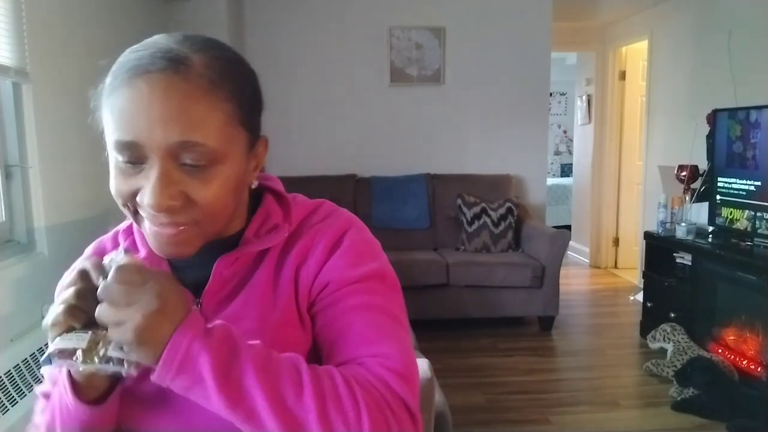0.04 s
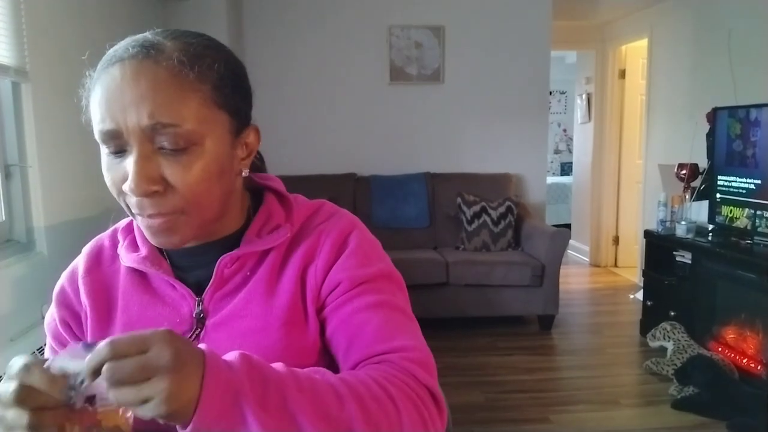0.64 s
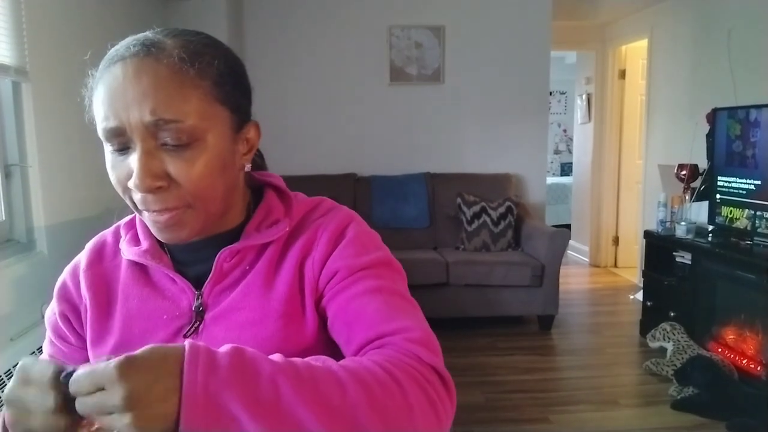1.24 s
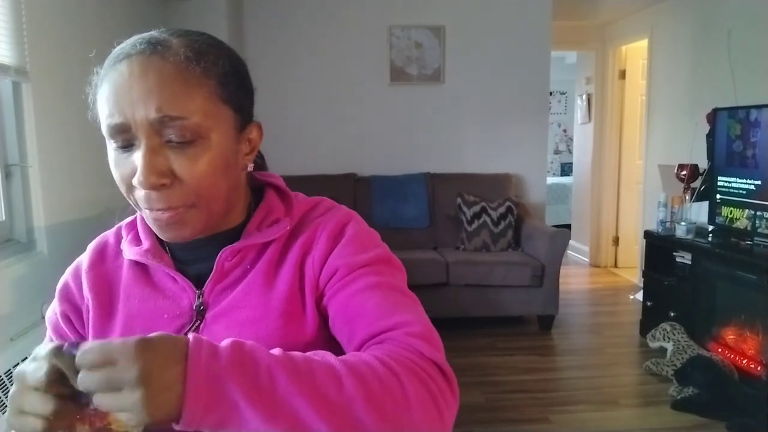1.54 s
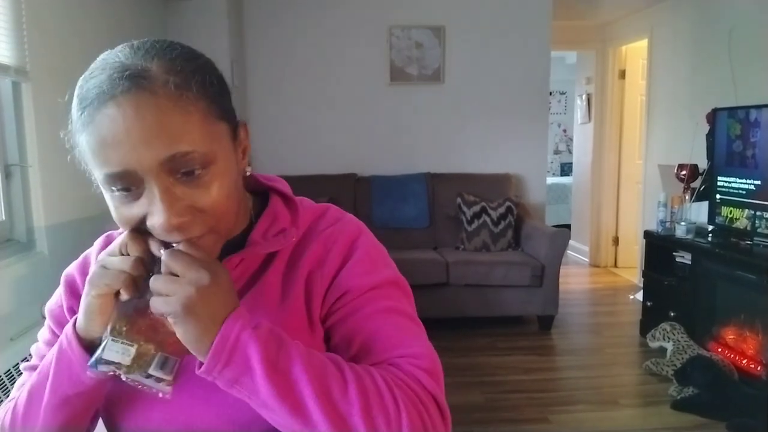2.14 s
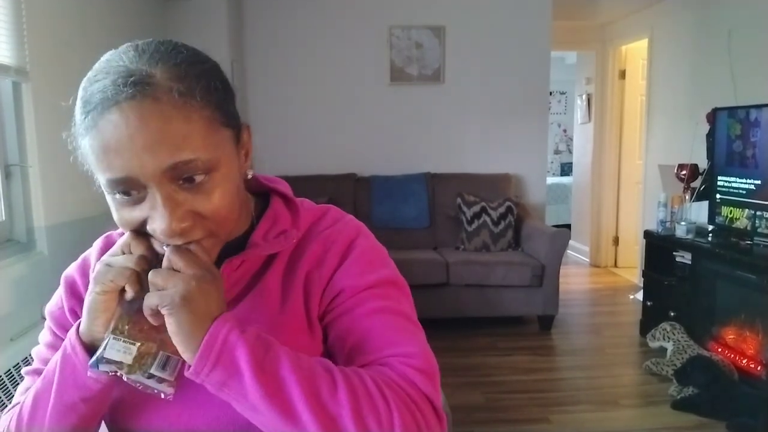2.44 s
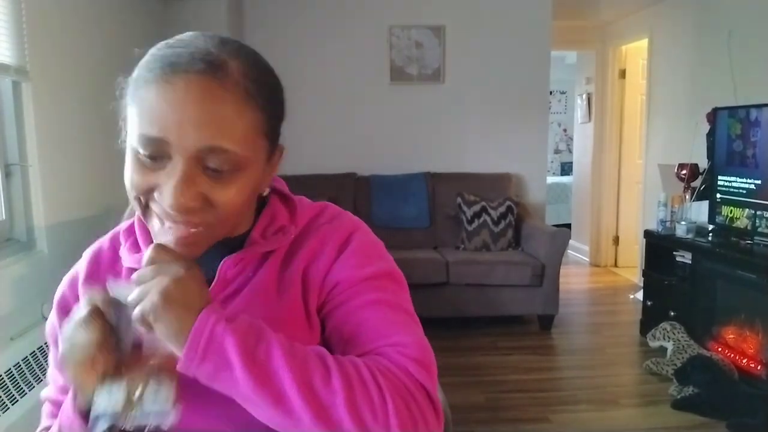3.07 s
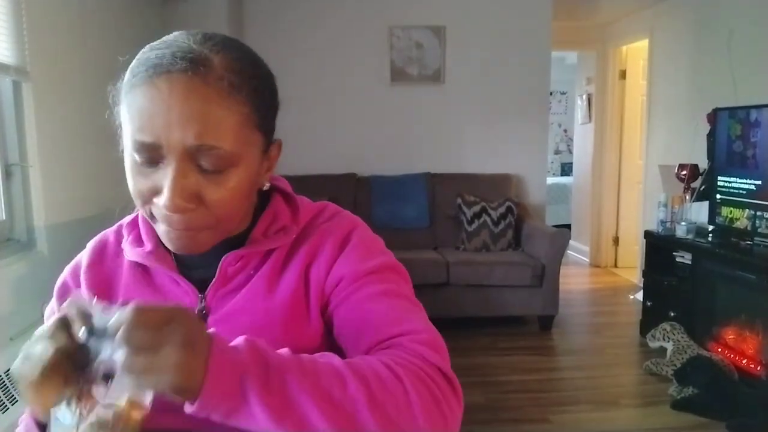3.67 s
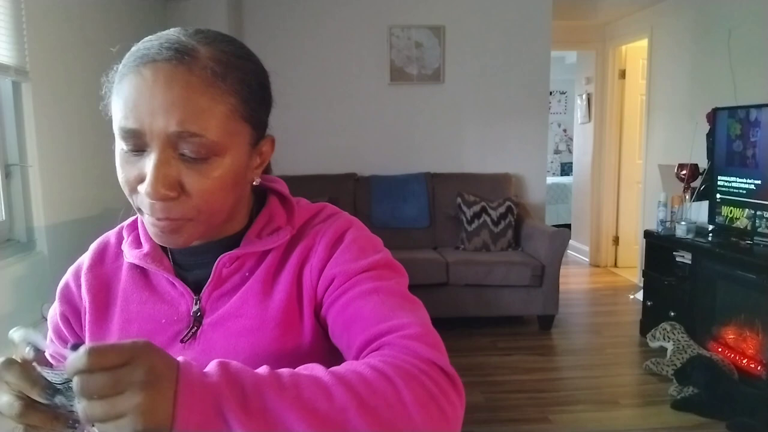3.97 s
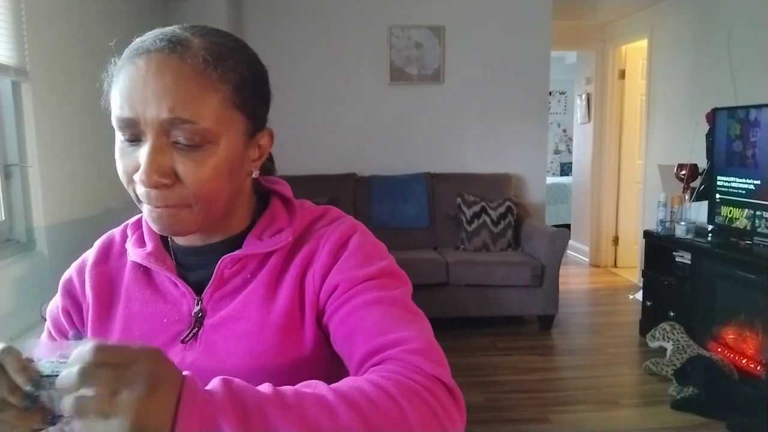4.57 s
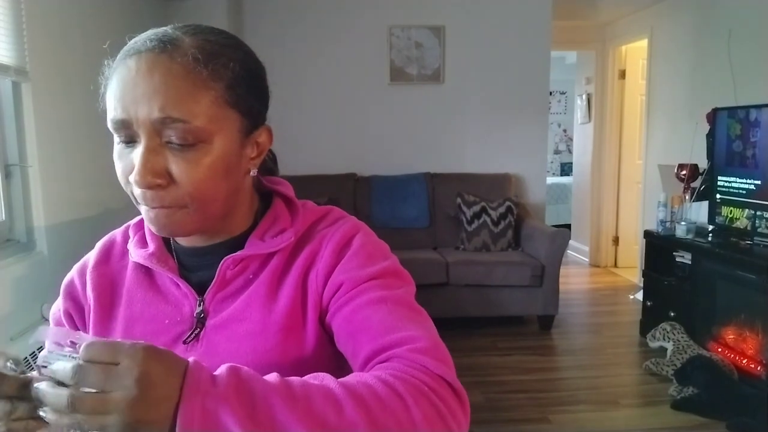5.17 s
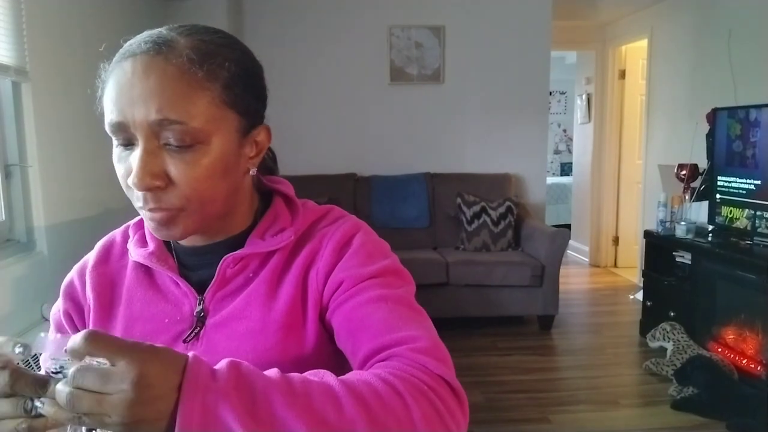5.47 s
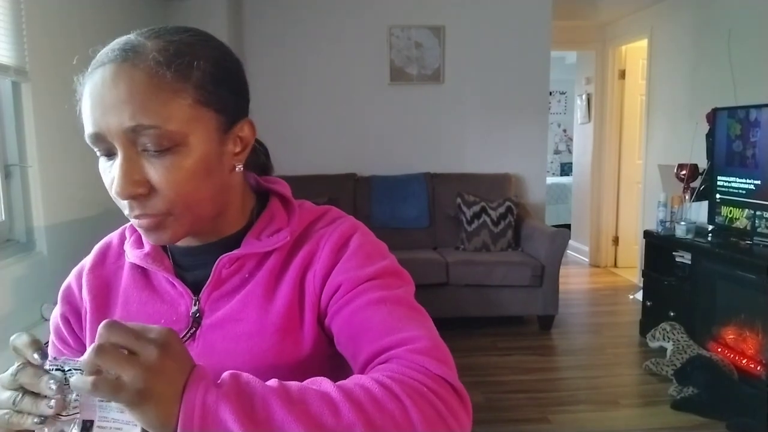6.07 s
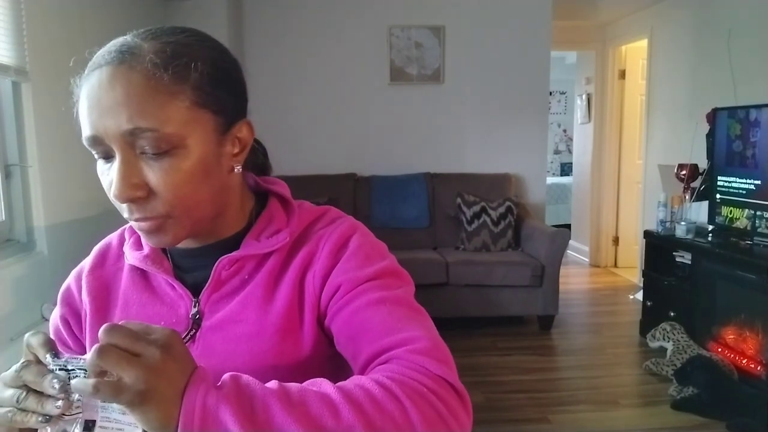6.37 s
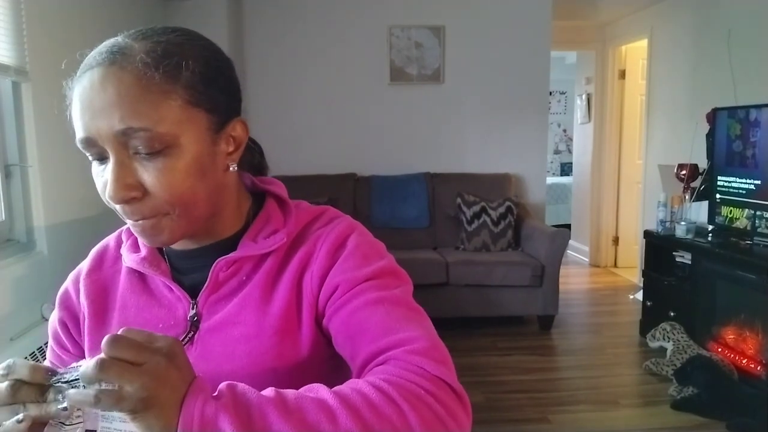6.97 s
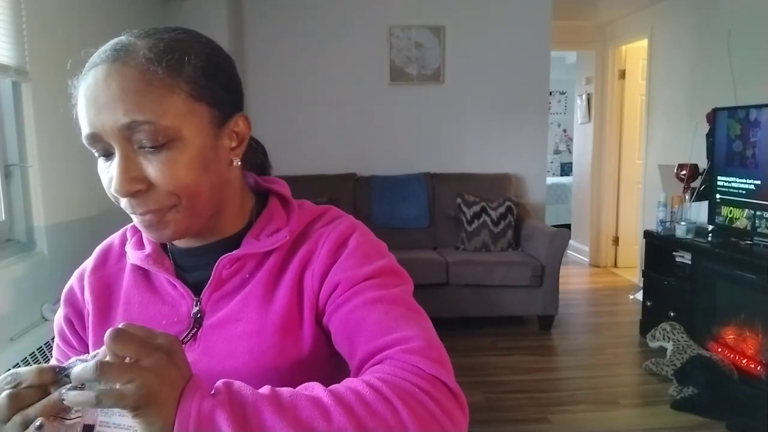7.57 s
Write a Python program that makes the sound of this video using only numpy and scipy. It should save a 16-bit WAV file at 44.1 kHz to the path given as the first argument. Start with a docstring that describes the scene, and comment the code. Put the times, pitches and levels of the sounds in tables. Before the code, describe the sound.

Close, bright crackling of a plastic packet being handled, bitten open with a pop and soft thuds, then handled gently in a quiet room.

```python
"""Living room, a plastic snack packet worked by hand close to a laptop's two microphone ports.
Over quiet room tone, tiny wrinkles crackle from the start, the film slips in short runs and creases
buckle with bright snaps that shake the sheet; desk and walls answer, with a few soft bumps beneath.
Bitten at the seam, the packet tears open at about 3 s: the loudest snaps, a hollow pop, then thuds
as the arms jerk apart. The handling goes on more lightly and thins out to a last small pop near 7.8 s."""
import sys
import numpy as np
from scipy import signal
from scipy.fft import rfft, irfft
from scipy.io import wavfile

SR = 44100
rng = np.random.default_rng(int(sys.argv[2]) if len(sys.argv) > 2 else 0)


def master_out(mix):
    """Clip the mix to full scale and print it as 16-bit PCM to the path in sys.argv[1]."""
    frames = np.transpose(np.atleast_2d(mix))
    ceiling = np.clip(frames, -1, 1)
    pcm = np.round(ceiling * 32767).astype(np.int16)
    wavfile.write(sys.argv[1], SR, pcm)


N = 344862


def undb(db):
    """Decibels to gain."""
    return 10 ** (np.asarray(db) / 20)


def colour(x, points, size=4096):
    """Causal filter through (Hz, dB) points, from the cepstrum of the log gain."""
    hz, db = np.transpose(points)
    grid = np.maximum(np.arange(size // 2 + 1) * SR / size, 1)
    gain = undb(np.interp(np.log(grid), np.log(hz), db))
    cepstrum = irfft(np.log(gain))
    cepstrum[1:size // 2] *= 2
    cepstrum[size // 2 + 1:] = 0
    response = irfft(np.exp(rfft(cepstrum)))[:size // 2]
    response = response.reshape((1,) * (x.ndim - 1) + (-1,))
    return signal.fftconvolve(x, response, axes=-1)[..., :x.shape[-1]]


def port_noise(shape, apart):
    """Noise at the two ports, shape (.., 2, samples); 'apart' is the share of power each has alone."""
    noise = rng.standard_normal((*shape[:-1], 3, shape[-1]))
    return np.sqrt(1 - apart) * noise[..., :1, :] + np.sqrt(apart) * noise[..., 1:, :]


def place(times, sounds):
    """Lays short sounds, shape (events, channels, samples), on the time line."""
    out = np.zeros((sounds.shape[1], N + sounds.shape[-1]))
    for start, sound in zip(np.clip(times * SR, 0, N).astype(int), sounds):
        out[:, start:start + len(sound[0])] += sound
    return out[:, :N]


# Spectrum of the quiet living room at the laptop: frequency_hz, gain_db
ROOM_TONE = [(24, -20), (38, 9), (55, -6.5), (90, -11), (160, -4.5), (350, -9), (700, -16), (1500, -25),
             (4000, -31), (7500, -32), (10300, -22), (13000, -49), (15000, -43)]

def room_tone(level_db=-66, split_hz=600):
    """Room rumble, shared by both ports, under a faint hiss that each port has on its own."""
    lowpass = signal.butter(1, split_hz, fs=SR)
    shared, own = port_noise((N,), apart=0.047), port_noise((N,), apart=1.0)
    rumble = signal.lfilter(*lowpass, shared)
    hiss = own - signal.lfilter(*lowpass, own)
    air = colour(rumble + hiss, ROOM_TONE, size=16384)
    return air / air.std() * undb(level_db)


# Spectra of a crease's crack, tick and flap as heard through the microphone ports,
# which ring near 10 kHz: frequency_hz, gain_db
CRACK = [(4000, -51.5), (7000, -21), (8900, -15.5), (10200, -3.5), (12200, -13.5), (15000, -27.5)]
TICK = [(2600, -22.5), (4300, -7), (7000, -3), (9500, -13)]
FLAP = [(100, -10.5), (300, -4.5), (700, 5.5), (930, -2.5), (1300, -2.5), (2700, 1.5), (6000, -3)]
# Crack, tick and flap of a flipping crease, at the ports: spectrum, low_pitch_hz, high_pitch_hz, decay_s
CREASE_FACETS = [(CRACK, 8500, 11500, .0008), (TICK, 3700, 7800, .0008), (FLAP, 1000, 3400, .0013)]

def shiver(times, db, facet, apart=0.54, ring_db=-7, beam_share=0.83, size=360):
    """A facet of film shivers, faintly pitched, beaming unevenly. Channels: left, right, into the room."""
    spectrum, low_hz, high_hz, decay_s = facet
    t = np.arange(size) / SR
    span = .0025 * SR  # levels are rms over 2.5 ms

    def unit_level(x):
        return x / np.sqrt(np.mean(x ** 2, axis=(1, 2), keepdims=True) * size / span)

    pitch, right_phase = rng.random((len(times), 2)).T[..., None, None]
    hz = low_hz * (high_hz / low_hz) ** pitch
    ring = undb(ring_db) * np.sqrt(2) * np.sin(2 * np.pi * hz * t + right_phase * np.array([[0], [1]]))
    envelope = t * np.exp(-2 * t / decay_s)
    burst = (port_noise((len(times), size), apart) + ring) * envelope
    beams = unit_level(colour(burst, spectrum, size=512))
    # the room gets all directions at once, so a smoother colour
    click = unit_level(colour(signal.unit_impulse((1, 1, size)), spectrum, size=512))
    all_round = unit_level(click + beam_share * beams[:, :1])
    return place(times, np.concatenate([beams, all_round], axis=1) * undb(db)[:, None, None])


def buckle(times, levels):
    """A crease flips: a bright crack, a tick of the fold and a slightly longer flap of the sheet."""
    return sum(shiver(times, db, facet) for db, facet in zip(levels, CREASE_FACETS))


# How hard the fingers work the film: time_s, level_db
FINGER_PRESSURE = [(0.0, -37.5), (0.41, -57), (0.6, -59), (1.09, -43.5), (1.5, -56), (1.85, -45.5),
                   (2.11, -44), (2.55, -57.5), (2.75, -44.5), (3.27, -43.5), (3.44, -54.5), (3.83, -43),
                   (4.09, -54), (5.2, -51.5), (5.9, -55), (6.45, -76), (6.99, -43.5), (7.23, -75.5),
                   (7.82, -58)]

def wrinkles(tick_db=-11, flap_db=-11, spread_db=4.5, count=520):
    """Tiny wrinkles give way at random, louder as the fingers press; most are faint, a few tick out."""
    jitter, strength = rng.random((count, 2)).T
    times = (np.arange(count) + 2 * jitter) / count * N / SR
    db = np.interp(times, *np.transpose(FINGER_PRESSURE)) + spread_db * (2 * strength ** 2 - 1)
    return buckle(times, (db, db + tick_db, db + flap_db))


# Runs of tearing or sliding film: start_s, length_s, crack_db, flap_db
RIP_RUNS = [(0.0, 0.086, -45.5, -56), (0.051, 0.026, -31.5, -46), (0.877, 0.07, -60, -78),
            (1.581, 0.23, -57, -70.5), (1.835, 0.047, -38.5, -56.5), (2.653, 0.23, -54, -63.5),
            (3.047, 0.02, -41, -45), (3.085, 0.019, -27.5, -36.5), (3.157, 0.055, -37.5, -51),
            (4.862, 0.033, -63, -75), (5.982, 0.041, -53.5, -62), (6.353, 0.018, -66.5, -71),
            (6.645, 0.019, -44.5, -67)]

def rips(slips_per_s=400, spread_db=5, fade_db=6, tick_db=-2.0):
    """The film gives in a fast uneven run of slips that weakens as the tension goes."""
    out = 0
    for start, length, crack_db, flap_db in RIP_RUNS:
        count = max(int(length * slips_per_s), 2)
        along = (np.arange(count) + rng.random(count)) / count
        scatter = spread_db * np.clip(rng.standard_normal(count), -2, 1)
        db = scatter - fade_db * (along ** 2 - .5)
        out = out + buckle(start + along * length, (crack_db + db, flap_db + tick_db + db, flap_db + db))
    return out


# Creases that snap out clearly, close to the microphone: start_s, crack_db, tick_db, flap_db
CREASE_SNAPS = [(0.0442, -27.5, -38, -48), (0.0604, -44, -30.5, -61), (0.172, -34.5, -43, -52),
                (0.2161, -29.5, -49, -46.5), (0.4966, -37.5, -54, -59), (0.5258, -27.5, -49, -40),
                (0.5473, -31.5, -44, -72), (0.5865, -29, -56, -42), (0.5917, -33.5, -40, -58),
                (0.638, -35, -43, -49), (0.6961, -43, -52, -49), (0.7612, -36.5, -53, -64),
                (0.806, -42, -45.5, -54.5), (0.9438, -30.5, -48, -53.5), (1.0355, -28, -61, -51),
                (1.0377, -23.5, -49, -56), (1.047, -42, -46, -50.5), (1.128, -36.5, -56, -55),
                (1.1471, -46, -60, -55), (1.2513, -40.5, -48.5, -56), (1.2768, -38, -59, -60),
                (1.3516, -35.5, -47.5, -52), (1.457, -29.5, -41.5, -73), (1.4654, -48, -49, -51.5),
                (1.62, -41.5, -46.5, -53), (1.6827, -45, -57, -49), (1.721, -40.5, -48.5, -59),
                (1.8006, -40, -45, -53), (1.8282, -29.5, -42.5, -59), (1.839, -28, -50, -71),
                (1.8533, -36, -46, -50), (1.9171, -31, -55, -65), (1.9583, -28.5, -42.5, -50.5),
                (2.061, -42, -72, -63), (2.155, -37.5, -53, -49), (2.2289, -29, -49, -45.5),
                (2.3225, -32, -44, -46.5), (2.451, -44, -50.5, -55.5), (2.5944, -43.5, -52, -58),
                (2.6725, -39, -70, -46.5), (2.7054, -31, -44.5, -55), (2.7235, -32, -49, -65),
                (2.7648, -23.5, -40, -40.5), (2.7902, -31.5, -42.5, -65), (2.8241, -34.5, -43.5, -47.5),
                (2.873, -34, -46, -46.5), (2.9359, -28.5, -50, -49), (2.9992, -41.5, -43.5, -50),
                (3.0264, -29, -58, -51), (3.0343, -28, -61, -42), (3.0529, -16.5, -51, -39),
                (3.0817, -15.5, -48, -34), (3.1547, -28.5, -47, -55), (3.1899, -19, -43, -41),
                (3.2705, -32, -66, -61), (3.295, -37, -51, -48.5), (3.3455, -33, -48, -58),
                (3.3721, -34, -50, -48.5), (3.4546, -30, -49, -45.5), (3.6078, -33, -45, -44),
                (3.676, -39, -50, -52.5), (3.6969, -34.5, -46, -52), (3.7111, -46, -44.5, -50.5),
                (3.7469, -33.5, -50.5, -49), (3.847, -33.5, -47.5, -78), (3.899, -39.5, -46, -51),
                (3.924, -34, -46, -68), (4.042, -45.5, -71, -61.5), (4.2667, -34, -56.5, -55.5),
                (4.3322, -37, -54, -66), (4.3459, -32, -47.5, -56.5), (4.5152, -39.5, -58, -63),
                (4.6564, -38.5, -50.5, -56.5), (4.75, -40.5, -47.5, -59), (4.769, -33.5, -59, -65),
                (4.8223, -36.5, -48.5, -49), (4.83, -35, -62, -63), (4.8622, -24, -38, -47),
                (4.9253, -36, -51, -58.5), (4.9724, -42, -60, -71), (5.02, -32, -48.0, -54),
                (5.0853, -39.5, -53, -47.5), (5.1641, -42, -50, -50), (5.1863, -38.5, -59, -55),
                (5.208, -34.5, -46, -50), (5.2492, -41, -70, -54), (5.3033, -46, -50.5, -63),
                (5.3435, -41, -54, -77), (5.4032, -39.5, -51, -51.5), (5.4454, -41, -55, -58),
                (5.5385, -35, -47, -52), (5.597, -36, -64, -81), (5.7404, -33.5, -46, -53),
                (5.7599, -22, -41.5, -53), (5.9501, -30, -44, -48), (6.028, -38.5, -43, -52.5),
                (6.0757, -41.5, -50, -55), (6.16, -41.5, -71, -70), (6.2682, -51.5, -56.5, -73),
                (6.6363, -30, -44.5, -97), (6.8324, -35, -47, -53.5), (6.9114, -43, -50, -58),
                (6.9328, -32, -44.5, -53.5), (6.9793, -34, -43.5, -73), (7.0634, -39.5, -49.5, -49.5),
                (7.1016, -42, -66, -54.5), (7.1503, -37.5, -48.5, -55.5), (7.3023, -79, -65, -63.5),
                (7.4739, -57, -57, -64), (7.7232, -40, -47, -52)]

def snaps(gain_db=0.5, before_db=-18, before_s=0.0018, after_db=-15, after_s=0.0084,
          fade_db_per_s=200, spread_db=3, neighbours=2):
    """A loud crease gives a little just before it flips, then trips its neighbours."""
    times, *levels = np.transpose(CREASE_SNAPS)
    levels = np.array(levels) + gain_db
    out = buckle(times, levels)
    lead = before_s * (.5 + rng.random(len(times)))
    out = out + buckle(times - lead, levels + before_db)
    for _ in range(neighbours):
        late = after_s * rng.exponential(size=len(times))
        scatter = spread_db * np.clip(rng.standard_normal(levels.T.shape).T, -2, 1)
        out = out + buckle(times + late, levels + after_db - fade_db_per_s * late + scatter)
    return out


# The living room's reverberation, band by band: frequency_hz, t60_s, level_db
ROOM_DECAY = [(503, 0.21, -3.5), (2580, 0.23, 0), (6360, 0.23, -3), (10120, 0.24, -6), (14600, 0.14, -11)]

def room_echoes(x, desk_db=-14, desk_s=0.0016, size=16384):
    """Early echoes off desk and body, then a diffuse tail that dies soonest in the top treble."""
    t = np.arange(size) / SR
    log_hz = np.log(np.maximum(np.arange(size // 2 + 1) * SR / size, 1))
    hz, t60, wet_db = np.transpose(ROOM_DECAY)
    noise = rfft(rng.standard_normal((2, size)))
    onset = np.clip(t / desk_s - 1, 0, 1)
    tail = 0
    for share, decay, db in zip(np.eye(len(hz)), t60, wet_db):
        band = irfft(noise * np.interp(log_hz, np.log(hz), share), size)
        fade = undb(-60 * t / decay) * onset
        tail = tail + undb(db) * band * fade / np.linalg.norm(fade)
    early = np.exp(-t / desk_s) * (t > desk_s)
    desk = undb(desk_db) * rng.standard_normal((2, size)) * early / np.linalg.norm(early)
    return signal.fftconvolve(x, desk + tail, axes=-1)


def turning_echoes(x, size=8192):
    """The packet keeps turning, so each short stretch of crackle meets its own pattern of echoes."""
    starts = np.arange(0, N, size)
    x = np.pad(x, (0, size))
    return place(starts / SR, np.array([room_echoes(x[None, i:i + size]) for i in starts]))


# Spectrum of a soft thud: frequency_hz, gain_db
THUD_SPECTRUM = [(25, -2), (60, -6), (120, 3), (180, -13.5), (500, -23.5)]
# Thuds of the arms, near the laptop: start_s, level_db
ARM_THUDS = [(0.186, -54.5), (0.25, -51.5), (0.368, -59), (3.31, -51.5), (3.386, -58.5), (3.485, -54),
             (3.724, -64)]

def arm_thuds(rise_s=0.001, decay_s=0.045, size=12000):
    """The arms jerk apart after a tear: dull, soft thuds, much the same at both ports."""
    times, db = np.transpose(ARM_THUDS)
    t = np.arange(size) / SR
    thuds = colour(port_noise((len(times), size), apart=0.32), THUD_SPECTRUM)
    thuds /= thuds.std(axis=(1, 2), keepdims=True)
    envelope = 2 * (1 - np.exp(-t / rise_s)) * np.exp(-t / decay_s)
    return place(times, thuds * envelope * undb(db)[:, None, None])


# Hollow pops of a whole panel of the packet: start_s, pitch_hz, level_db
PANEL_POPS = [(3.034, 730, -61), (3.096, 1020, -33), (6.075, 430, -48.5), (7.784, 1360, -50)]

def panel_pops(decay_s=0.0012, size=1200):
    """A panel turns inside out and thumps the air in the packet: a few damped cycles."""
    times, hz, db = np.transpose(PANEL_POPS)
    t = np.arange(size) / SR
    rings = 2 * undb(db)[:, None] * np.sin(2 * np.pi * hz[:, None] * t) * np.exp(-t / decay_s)
    return place(times, rings[:, None])


def scene(balance_db=1.25, lag_samples=6):
    """At the laptop, the packet's sound reaches the left port first; the right is a little louder."""
    left, right, all_round = snaps() + wrinkles() + rips() + panel_pops()
    direct = np.array([left, np.pad(right, (lag_samples, 0))[:N]])
    port_gains = undb(np.array([[-balance_db], [balance_db]]) / 2)
    return (direct + turning_echoes(all_round) + arm_thuds() + room_tone()) * port_gains


def record(dry, peak_limit=0.49, top_hz=15500):
    """The laptop's microphone input rounds the loudest peaks and cuts the top."""
    rounded = peak_limit * np.tanh(dry / peak_limit)
    lowpass = signal.ellip(8, .2, 70, top_hz, fs=SR, output="sos")
    return signal.sosfilt(lowpass, rounded)


dry = scene()
out = record(dry)
master_out(out)
```